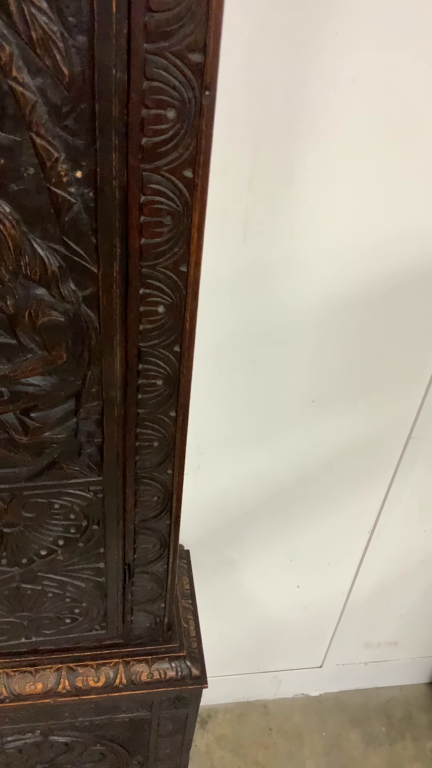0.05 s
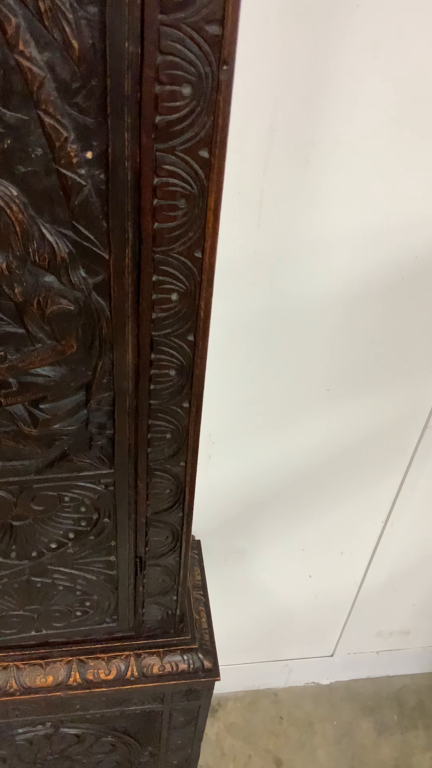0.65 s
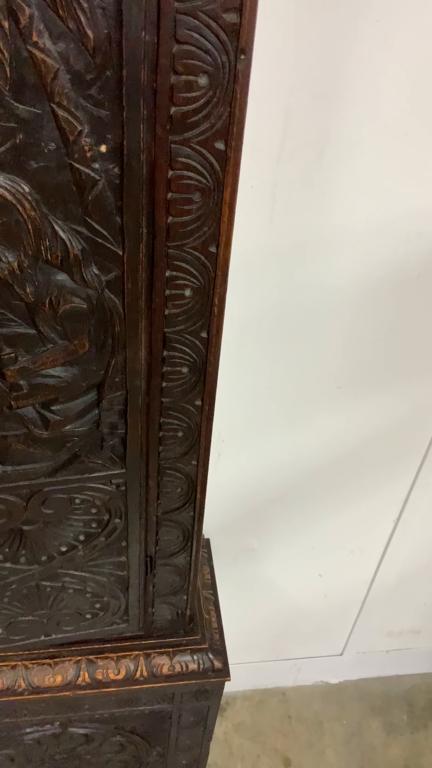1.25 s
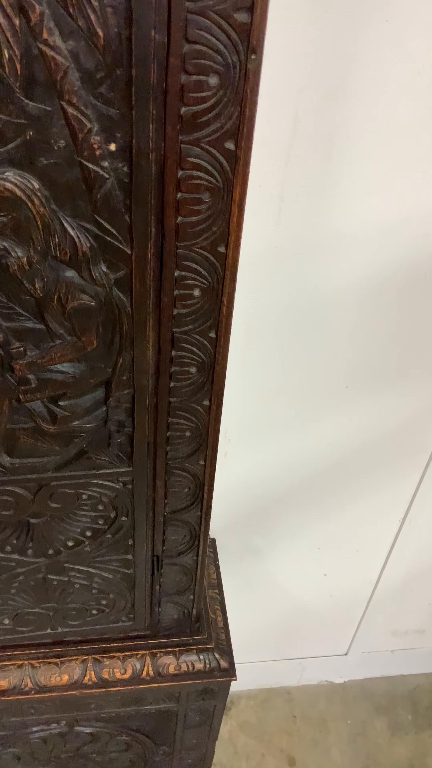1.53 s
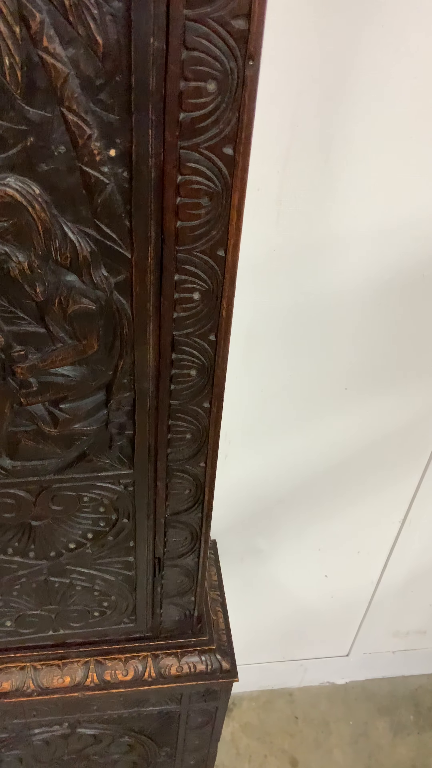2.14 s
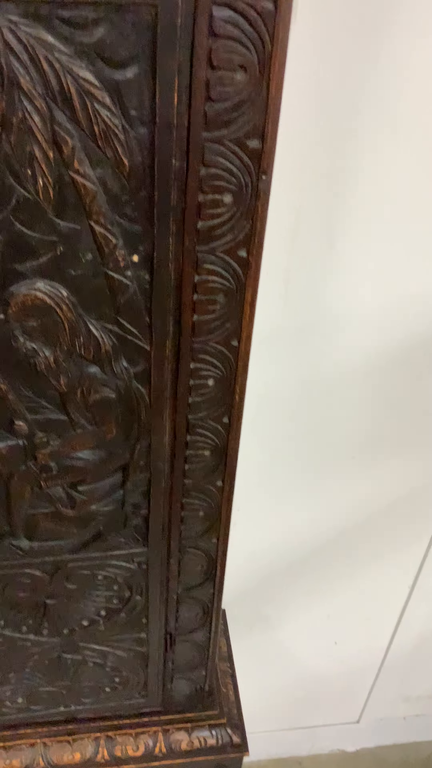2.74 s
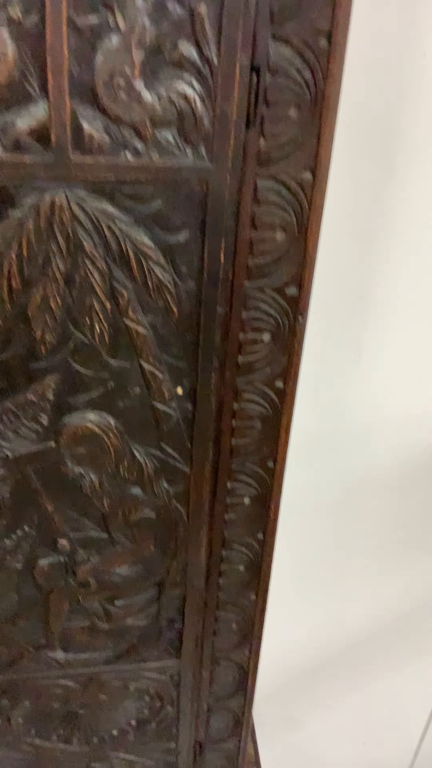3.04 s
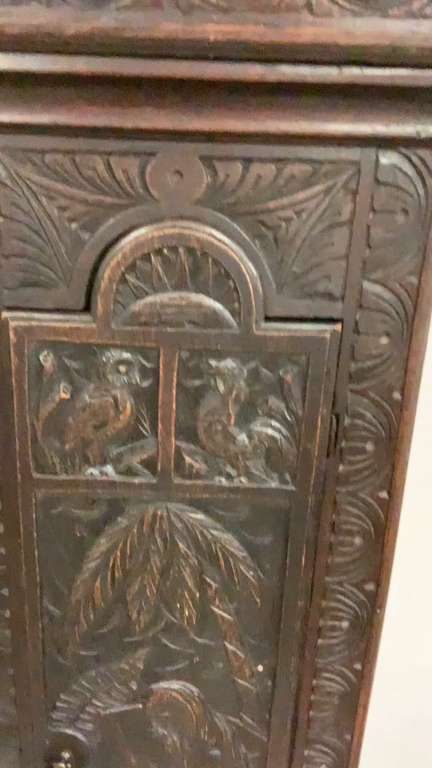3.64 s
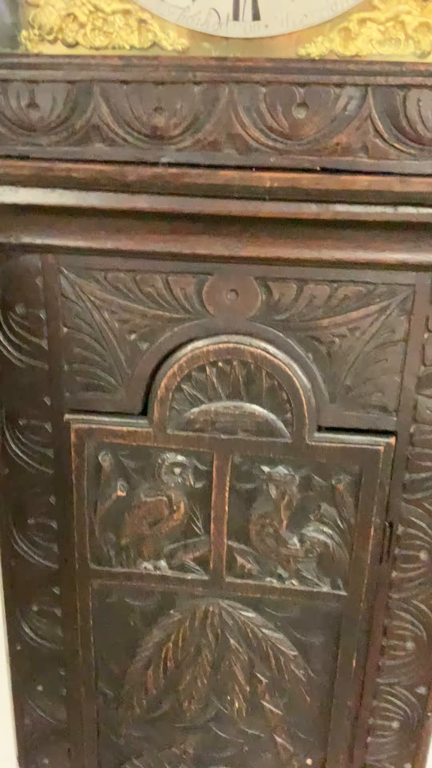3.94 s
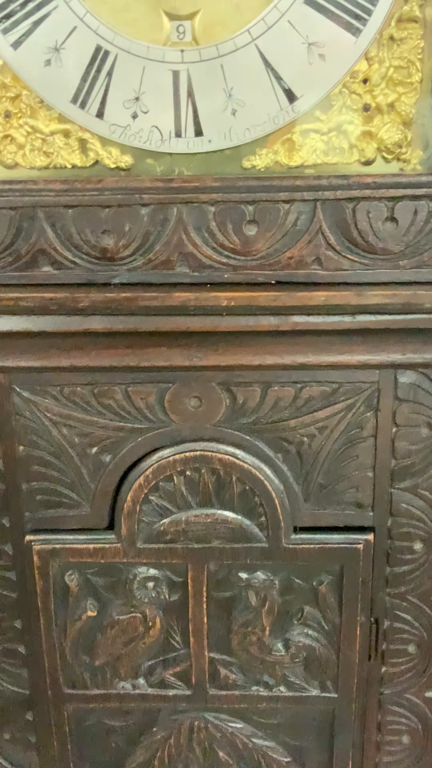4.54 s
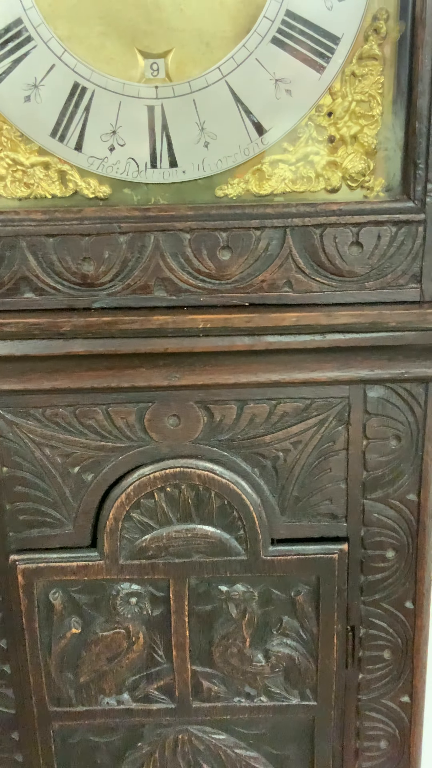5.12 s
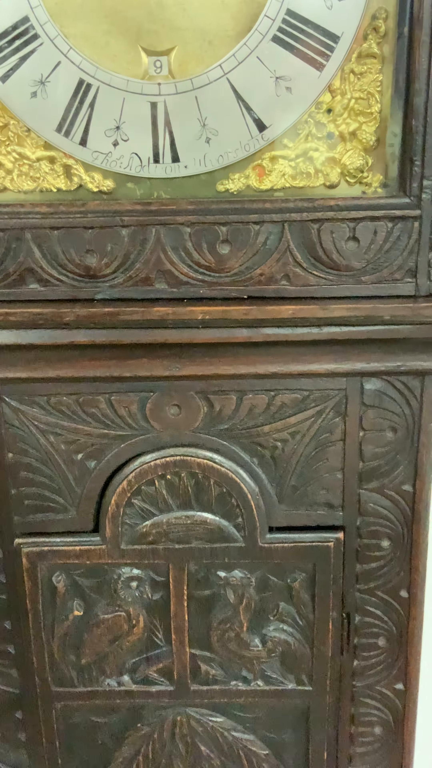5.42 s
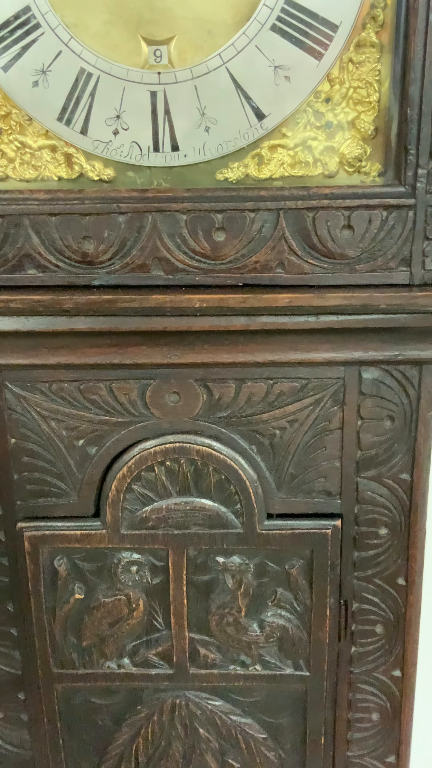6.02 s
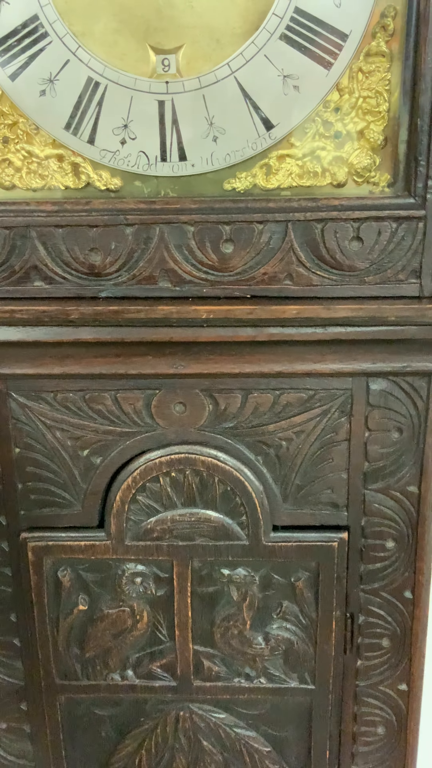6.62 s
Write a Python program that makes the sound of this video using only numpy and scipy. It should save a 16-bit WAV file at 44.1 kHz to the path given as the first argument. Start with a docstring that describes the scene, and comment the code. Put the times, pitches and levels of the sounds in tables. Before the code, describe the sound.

A longcase clock's wooden door knocks and creaks as it is handled, then shuts with a hollow clunk, over faint ticking.

```python
"""A longcase clock in a quiet room, heard from close by on a hand-held stereo microphone pair.
First its wooden door is handled: it knocks, and creaks as it sticks and slips against the frame.
Each blow booms in the hollow trunk, clacks in the panel and snaps at the point of contact.
After a sharp click at 2.6 s come soft swishes, shuffling and light taps, with the pendulum's faint,
hissing ticks going on throughout. At 6.5 s the door is knocked shut and a low rumble dies away."""
import sys
import numpy as np
from scipy import signal
from scipy.fft import rfft, irfft
from scipy.io import wavfile

SR = 44100
rng = np.random.default_rng(int(sys.argv[2]) if len(sys.argv) > 2 else 0)


def dump(signal):
    """Clip the signal to [-1, 1] and save it as 16-bit WAV at the path in sys.argv[1]."""
    limited = np.clip(np.atleast_2d(signal).T, -1, 1)
    pcm = np.round(limited * 32767).astype(np.int16)
    wavfile.write(sys.argv[1], SR, pcm)


N = 302945

SLIP_BOOM_DB, SLIP_CLACK_DB, SLIP_SNAP_DB = -12, -5, -22.5  # against the slip's own level
SLIP_CONTACT_S, SLIP_SPOT_HZ = .006, 1900
# blows on the door, close to the microphones: start_s, boom_db, clack_db, snap_db, contact_s, spot_hz
DOOR_BLOWS = [(.063, -31, -25.5, -37.5, 0.0053, 1550), (.101, -56, -30.5, -46, 0.0016, 2000),
              (.319, -36.5, -37.5, -62, 0.004, 1500), (.481, -53, -43.5, -80, 0.0032, 1790),
              (.497, -41.5, -43, -80, 0.0024, 1850), (.567, -45, -51.5, -80, .0026, 1470),
              (.637, -47, -28.5, -41, .0055, 1760), (.753, -51, -49, -51, .004, 1510),
              (.826, -50, -36, -44.5, 0.008, 600), (.843, -58, -36, -34, .001, 1900),
              (.848, -57, -25.5, -42, .0006, 1870), (1.077, -55.5, -47, -74, 0.0026, 780),
              (1.517, -32, -29, -52, .006, 1200), (1.543, -37, -38, -62, .003, 580),
              (1.7, -63, -53, -88, .003, 1510), (1.81, -56.5, -58, -76, .012, 596),
              (2.616, -68, -28, -25.5, 0.00037, 4000), (2.621, -70, -33, -42, .0025, 520),
              (4.098, -71, -64, -54, .0004, 2020), (4.324, -65.5, -58.5, -74, .005, 378),
              (4.365, -67.5, -66, -59.5, .0006, 380), (5.225, -57.5, -53, -79, .006, 381),
              (5.466, -69, -66, -59, 0.00037, 1990), (5.736, -48, -44, -34.5, 0.0014, 1500),
              (5.757, -54, -44.5, -36, 0.00022, 350), (6.285, -56.5, -59.5, -76, 0.0076, 705),
              (6.412, -43.5, -40, -34.5, 0.0007, 750), (6.497, -54, -55, -41.5, .001, 2000),
              (6.511, -40.5, -52, -36, 0.0023, 2000), (6.529, -25.5, -33.5, -18.5, 0.0023, 1880),
              (6.537, -34, -27, -51, 0.00067, 1100), (6.545, -31, -27, -48, 0.0029, 402)]
def knocks(size=24000):
    """Each blow or slip sounds the door at once; the heavy trunk swells after it."""
    trunk, door = np.zeros(N), np.zeros((2, N))
    t = np.arange(size) / SR
    swell = np.minimum(t / SWELL_S, 1) ** .9
    jolts = [(s, db + SLIP_BOOM_DB, db + SLIP_CLACK_DB, db + SLIP_SNAP_DB, SLIP_CONTACT_S, SLIP_SPOT_HZ)
             for s, db in DOOR_SLIPS]
    for s, boom_db, clack_db, snap_db, contact_s, spot_hz in DOOR_BLOWS + jolts:
        boom = amp(boom_db) * trunk_boom(t)
        add(trunk, s, swell * (boom + case_rocking(t, boom_db)))
        press = 1 - np.exp(-(t / contact_s) ** 2)
        clack = amp(clack_db) * panel_clack(t, spot_hz)
        snap = amp(snap_db) * contact_snap(t, spot_hz, contact_s)
        add(door, s, press * (clack + snap) + swell * door_rattle(t, boom_db))
    return trunk, door


SWELL_S = .021  # the heavy case takes longer to move than the door
# modes of the hollow trunk: pitch_hz, level_db, t60_s
TRUNK_MODES = [(55.8, -26.5, 0.43), (94.55, -6, 0.59), (133.4, -2.5, 0.06), (189.3, 1.5, 0.25),
               (207.9, -1.5, 0.18), (276.3, -14.5, 0.21), (328.3, -11.5, 0.24), (371.6, -17.5, 0.29),
               (435.5, -8.5, 0.17), (540, -21.5, 0.074)]
# spectrum of the trunk's dull thud: frequency_hz, level_db
THUD_SPECTRUM = [(15, -72.5), (35, -38), (70, -10), (130, -5), (220, -5), (400, -11.5), (700, -20.5),
                 (1500, -51), (4000, -81)]
def trunk_boom(t):
    """The hollow trunk rings in its low modes over a thud of noise."""
    thud = amp(-8) * noise(THUD_SPECTRUM, len(t)) * fade(t, t60=.3, hold=SWELL_S)
    return ring(TRUNK_MODES, t, hold=SWELL_S) + thud


# spectrum of the case rocking on the floor: frequency_hz, level_db
ROCKING_SPECTRUM = [(22, -34.5), (45, -0.5), (75, 0.5), (130, -5.5), (300, -40)]
def case_rocking(t, boom_db, heavy_db=-25.5, growth=2.8):
    """Only a heavy blow rocks the whole case: the deep rumble grows faster than the boom."""
    rumble_db = -43 + growth * (boom_db - heavy_db)
    return amp(rumble_db) * noise(ROCKING_SPECTRUM, len(t)) * fade(t, t60=.7)


# modes of the door panel: pitch_hz, level_db, t60_s
PANEL_MODES = [(440.4, -16, 0.14), (540, -14.5, 0.067), (631.3, -5.5, 0.059), (860, -12.5, 0.13),
               (1112, -8, 0.1), (1480, 3, 0.067), (1510, -6, 0.015), (1779, -2.5, 0.032), (2040, -7, .05),
               (2281, -5, 0.066)]
# spectrum of the door's dense, short modes: frequency_hz, level_db
WOOD_SPECTRUM = [(60, -30.5), (200, -2.5), (450, 2.5), (800, -1.5), (1100, -1), (1500, 3.5), (2100, -0.5),
                 (2700, -3.5), (3800, -7), (5500, -27.5), (10000, -54), (16000, -55)]
def panel_clack(t, spot_hz):
    """The panel rings briefly; the higher the struck spot rings, the brighter the whole clack."""
    tilt_db = 2.5 * np.log2(spot_hz / 2300)
    modes = amp(-3.5) * ring(PANEL_MODES, t, tilt_db)
    return modes + dense_modes(WOOD_SPECTRUM, t, spot_hz, tilt_db) * fade(t, t60=.079)


def door_rattle(t, boom_db):
    """The swaying case rattles the door dully."""
    wood = dense_modes(WOOD_SPECTRUM, t, spot_hz=500, tilt_db=-5.5)
    return amp(boom_db - 10) * wood * fade(t, t60=.087, hold=SWELL_S)


# spectrum at the point of contact: frequency_hz, level_db
SNAP_SPECTRUM = [(300, -21), (1200, -6), (2500, -3), (3800, -0.5), (4800, -4.5), (5800, -4.5), (8000, -9),
                 (12000, -15), (16000, -22)]
def contact_snap(t, spot_hz, contact_s):
    """A bright snap where the blow lands; a slower contact draws it out."""
    return dense_modes(SNAP_SPECTRUM, t, spot_hz) * fade(t, t60=.0079 + 6.8 * contact_s)


def dense_modes(spectrum, t, spot_hz, tilt_db=0, spot_db=7, spot_octaves=.24):
    """Crowded wood modes as noise, lifted round the spot's ring; each microphone hears its own mix."""
    hz = np.geomspace(30, 16000, 120)
    lift_db = spot_db * np.exp(-(np.log2(hz / spot_hz) / spot_octaves) ** 2)
    shaped = np.transpose([hz, read(spectrum, hz) + lift_db])
    return diffuse_noise(shaped, len(t), tilt_db)


# the door sticking and slipping against its frame: start_s, level_db
DOOR_SLIPS = [(0.097, -29.5), (0.1307, -39), (0.1677, -37), (0.3549, -37), (0.3903, -45.5), (0.4221, -45.5),
              (0.479, -58), (0.5355, -64), (0.5895, -69.5), (0.611, -59.5), (1.560, -40)]
# spectrum of one slip: frequency_hz, level_db
SLIP_SPECTRUM = [(900, -36), (1500, -1), (2050, 0.5), (2700, -6), (3600, 0.5), (5000, -7), (8000, -15.5),
                 (11000, -26), (16000, -36)]
def creaks(size=4096):
    """Each slip is a click that bends along the wood: the treble arrives first, so it chirps down."""
    out, t = np.zeros((2, N)), np.arange(size) / SR
    hz = np.fft.rfftfreq(size, 1 / SR)
    delay_s = .00051 + .028 / (1 + (hz / 1000) ** 2)
    phase = 2 * np.pi * np.cumsum(delay_s) * SR / size
    chirp = irfft(amp(read(SLIP_SPECTRUM, hz)) * np.exp(-1j * phase))
    for s, db in DOOR_SLIPS:
        scatter = .063 * pair(*rng.standard_normal((2, size))) * fade(t, t60=.035)
        frame_echoes = signal.fftconvolve(chirp[None], scatter)[:, :size]
        add(out, s, amp(db) * (chirp + frame_echoes) / abs(chirp).max())
    return out


# faint squeaks of wood: start_s, pitch_hz, level_db, length_s
WOOD_SQUEAKS = [(1.412, 3740, -80, 0.024), (2.312, 2960, -69.5, 0.032), (6.293, 2800, -65, 0.034)]
def squeaks(spread=1.4):
    """Wood rubs on wood in a narrow, fuzzy band."""
    out = np.zeros(N)
    for s, hz, db, length in WOOD_SQUEAKS:
        size = int(length * SR)
        band = [(hz / spread, -40), (hz, 0), (hz * spread, -40)]
        add(out, s, amp(db) * signal.windows.tukey(size, .5) * noise(band, size))
    return out


def ticks(first_s=.296, beat_s=.4318):
    """The pendulum beats evenly: a soft hissing tick and a duller tock in turn."""
    out = np.zeros((2, N))
    for beat, s in enumerate(np.arange(first_s, N / SR, beat_s)):
        tilt_db = -4.5 if beat % 2 else -.25
        add(out, s, amp(-65) * puff(rise_s=.0094, hold_s=.034, tilt_db=tilt_db))
    return out


# soft swishes among the ticks: start_s, level_db, length_s
SOFT_SWISHES = [(3.3, -59.5, 0.079), (3.606, -77, 0.14), (3.76, -58, 0.08), (3.971, -53, 0.039),
                (4.277, -76, 0.052), (4.807, -71, .054), (5.032, -62, 0.022), (5.199, -68.5, 0.025),
                (6.258, -67, 0.072)]
def swishes():
    """Brighter puffs, most of them swelling more slowly than the ticks."""
    out = np.zeros((2, N))
    for s, db, length in SOFT_SWISHES:
        rise_s = .39 * length
        add(out, s, amp(db) * puff(rise_s, length - rise_s, tilt_db=1.66))
    return out


# spectrum of the hiss in ticks and swishes: frequency_hz, level_db
HISS_SPECTRUM = [(200, -11), (700, 4), (1500, 10), (2700, 6.5), (5500, 0.5), (7500, -1), (10500, -1),
                 (13000, -2), (15500, -8.5)]
def puff(rise_s, hold_s, tilt_db, size=16000):
    """A puff of finely grained hiss that swells, holds and dies."""
    t = np.arange(size) / SR
    shape = np.minimum(t / rise_s, 1) * fade(t, t60=.17, hold=rise_s + hold_s)
    grain_db = noise([(20, -21.5), (80, .5), (400, -2.5), (1500, -32.5)], size) - .93
    return shape * amp(grain_db) * diffuse_noise(HISS_SPECTRUM, size, tilt_db)


# two curves, the early rubbing and the rumble round the door's shutting: time_s, level_db
RUMBLE_CURVES = [
    [(0.0, -69), (0.32, -55.5), (0.7, -49.5), (1.24, -67), (1.56, -70.5), (1.68, -56.5), (2.3, -70)],
    [(5.85, -64.5), (6.166, -70.5), (6.328, -61.5), (6.544, -49.5), (6.598, -40.5), (6.754, -63.5),
     (6.87, -63)],
]
# spectrum of the rubbing and rumble: frequency_hz, level_db
RUMBLE_SPECTRUM = [(30, -42.5), (60, -14), (95, 3.5), (140, -3.5), (200, 1), (380, -4.5), (700, -13),
                   (1500, -16), (4000, -44.5), (15000, -70)]
def rub_and_rumble(t):
    """Low, dull rubbing, then the rumble dying away after the door shuts."""
    return amp(-3) * sum(level(curve, t) for curve in RUMBLE_CURVES) * diffuse_noise(RUMBLE_SPECTRUM, N)


# shuffling in the pause: time_s, level_db
SHUFFLE_CURVE = [(3.9, -68.5), (4.14, -66), (4.19, -82), (4.35, -65.5), (4.52, -73.5), (4.632, -61),
                 (4.876, -74), (4.942, -60.5), (5.7, -69.5)]
# spectrum of the shuffling: frequency_hz, level_db
SHUFFLE_SPECTRUM = [(18, -57.5), (32, -20.5), (55, -0.5), (95, 5.5), (150, -1), (220, -2.5), (380, -8.5),
                    (700, -19), (1500, -22.5), (4000, -53)]
def shuffling(t):
    """Low, dull shuffling before the door is shut."""
    return amp(-1) * level(SHUFFLE_CURVE, t) * diffuse_noise(SHUFFLE_SPECTRUM, N)


# room tone at the microphones: frequency_hz, level_db
AIR_SPECTRUM = [(18, -59), (27, -19), (37, 1.5), (55, 4), (100, -3.5), (200, -8), (400, -9.5), (700, -13),
                (1000, -15.5), (1500, -11.5), (2200, -24.5), (3500, -31.5), (6000, -41), (15000, -42.5)]
def background(hum_hz=676):
    """Steady room air with a faint hum; rubbing, rumble and shuffling come and go in small lumps."""
    t = np.arange(N) / SR
    air = amp(-67.5) * diffuse_noise(AIR_SPECTRUM, N)
    hum = amp(-80.5) * unit(np.sin(2 * np.pi * hum_hz * t))
    lumps_db = 3 * noise([(3, -18.5), (10, 2), (20, 0), (50, -37), (200, -120)], N)
    return air + hum + amp(lumps_db) * (rub_and_rumble(t) + shuffling(t))


# decay of the room round the clock: frequency_hz, t60_s
ROOM_DECAY = [(100, 0.62), (300, 0.34), (800, 0.2), (1800, 0.2), (4000, 0.22), (8000, 0.19), (15000, 0.25)]
def room(x, size=32768):
    """The walls return a short diffuse tail whose bass lasts longest."""
    flat = np.array([noise([(1, 0), (SR, 0)], size) for _ in range(2)])
    hz, t, bands = signal.stft(flat, SR, nperseg=256)
    tails = signal.istft(bands * fade(t, read(ROOM_DECAY, hz)[:, None]), SR)[1][:, :size]
    tails *= 1 - np.exp(-(np.arange(size) / SR / .002) ** 2)  # builds as the nearest walls answer
    return signal.fftconvolve(x[None], pair(*tails) / np.linalg.norm(tails[0]), axes=1)[:, :N]


# likeness of the left and right microphones: frequency_hz, correlation
MIC_LIKENESS = [(100, 0.97), (280, 0.87), (600, 0.38), (1150, 0.12), (1700, 0.64), (2400, 0.17),
                (3400, 0.076), (4200, 0.17), (5000, 0.85), (15000, 1)]
def pair(a, b):
    """Two unrelated sounds become a diffuse field at the two microphones."""
    like = np.clip(read(MIC_LIKENESS, np.fft.rfftfreq(len(a), 1 / SR)), 0, 1)
    mid, side = np.sqrt((1 + like) / 2) * rfft(a), np.sqrt((1 - like) / 2) * rfft(b)
    return irfft(np.array([mid + side, mid - side]), len(a))


def diffuse_noise(spectrum, size, tilt_db=0):
    """Shaped noise that reaches the microphones from all round."""
    return pair(noise(spectrum, size, tilt_db), noise(spectrum, size, tilt_db))


def noise(spectrum, size, tilt_db=0):
    """Noise of rms 1 with a spectrum, tilted by dB per octave above 200 Hz."""
    hz = np.fft.rfftfreq(size, 1 / SR)
    gain = amp(read(spectrum, hz) + tilt_db * np.log2(np.maximum(hz, 200) / 1000))
    return unit(np.fft.irfft(gain * np.exp(2j * np.pi * rng.random(len(hz))), size))


def ring(modes, t, tilt_db=0, hold=0, vary_db=2, detune=.011):
    """Modes that start at rms 1 and die after a hold; each blow weights and detunes them a little."""
    hz, db, t60 = np.transpose(modes)[:, :, None]
    weight, load = rng.standard_normal((2, len(modes), 1))
    polarity = (-1) ** np.arange(len(modes))[:, None]
    gain = polarity * amp(db + tilt_db * np.log2(hz) + vary_db * weight)
    waves = np.sin(2 * np.pi * hz * (1 + detune * load) * t) * fade(t, t60, hold)
    return (gain * waves).sum(0) / np.sqrt((gain ** 2).sum() / 2)


def fade(t, t60, hold=0):
    """Holds, then falls by 60 dB in t60 seconds."""
    return np.exp(-np.log(1000) * np.maximum(t - hold, 0) / t60)


def level(curve, t):
    """Gain along a dB curve, silent outside it."""
    return amp(np.interp(t, *np.transpose(curve), left=-np.inf, right=-np.inf))


def amp(db):
    """Decibels to gain."""
    return 10 ** (np.asarray(db) / 20)


def unit(x):
    """Scales to rms 1."""
    return x / np.sqrt(np.mean(x ** 2) + 1e-20)


def read(points, hz):
    """Reads a table on a log-frequency axis."""
    f, value = np.transpose(points)
    return np.interp(np.log(hz + 1), np.log(f + 1), value)


def add(mix, s, sound):
    """Adds a sound at time s."""
    part = mix[..., max(round(s * SR), 0):][..., :sound.shape[-1]]
    part += sound[..., :part.shape[-1]]


def scene():
    """Door, trunk and ticks close up, each with its share of the room, over the room tone."""
    trunk, door = knocks()
    creak = creaks()
    soft = ticks() + swishes() + squeaks()
    to_walls = amp(-14) * trunk + amp(-3.5) * door + amp(-6.5) * creak + amp(-2.5) * soft
    return trunk + door + creak + soft + room(to_walls.mean(0)) + background()


# balance of the microphone pair: frequency_hz, left_minus_right_db
MIC_BALANCE = [(120, -0.5), (280, 0.6), (450, 3.5), (800, 2.5), (1500, -7.5), (2300, -5), (3500, -4),
               (5000, -0.1)]
# phase between the microphones: frequency_hz, left_lead_rad
MIC_LEAD = [(0, 0), (900, 0.9), (1350, 5), (1650, 2.5), (2100, 0.5), (2850, -2), (3600, -1.34), (4100, 0.5),
            (4980, 3.5)]
def record(dry, treble_lag_s=.00064, cutoff_hz=15900):
    """The microphones differ in colour and phase, the right lagging in the treble; then a low-pass."""
    hz = np.fft.rfftfreq(2 * N, 1 / SR)
    lead = np.interp(hz, *np.transpose(MIC_LEAD))
    lead += 2 * np.pi * treble_lag_s * np.maximum(hz - MIC_LEAD[-1][0], 0)
    left = amp(read(MIC_BALANCE, hz) / 2)
    right = np.exp(-1j * lead) / left
    heard = irfft(rfft(dry, 2 * N) * np.array([left, right]))[:, :N]
    lowpass = signal.firwin(301, cutoff_hz, window=("kaiser", 8), fs=SR)
    return signal.oaconvolve(heard, lowpass[None], "same")


dry = scene()
out = record(dry)
dump(out)
```